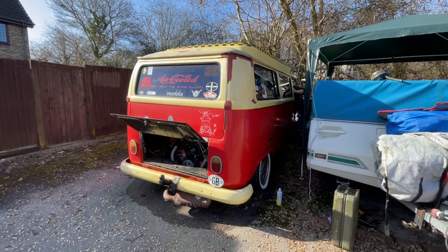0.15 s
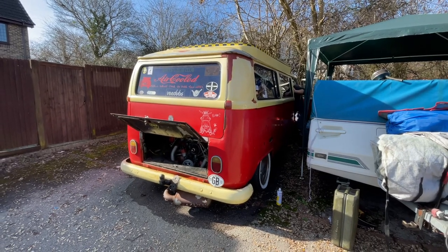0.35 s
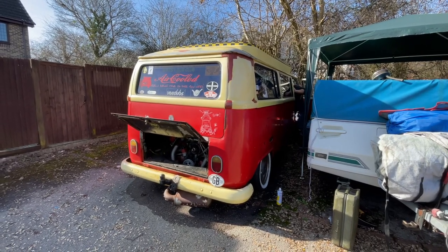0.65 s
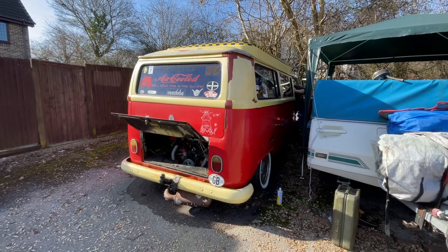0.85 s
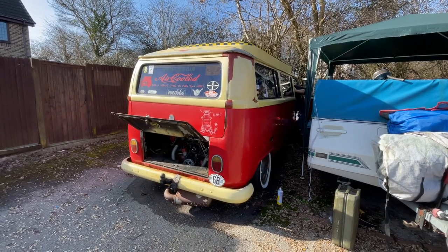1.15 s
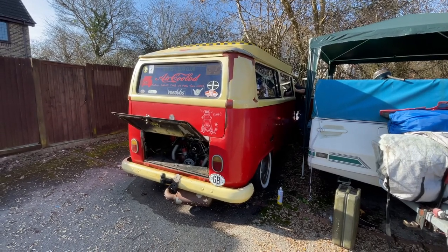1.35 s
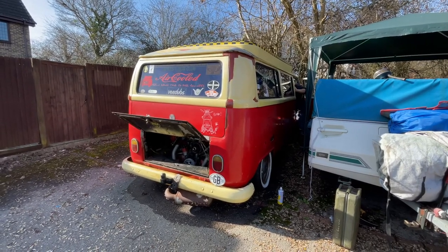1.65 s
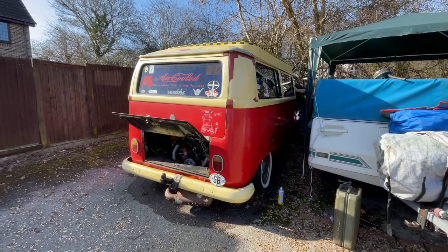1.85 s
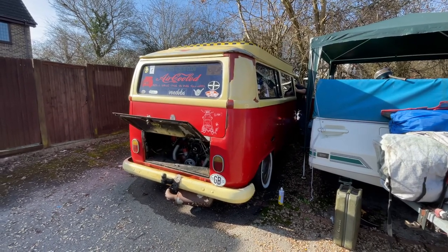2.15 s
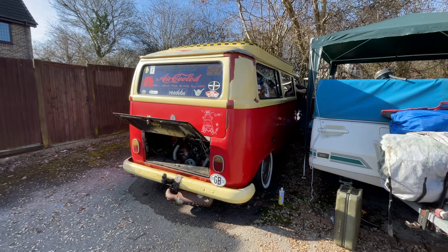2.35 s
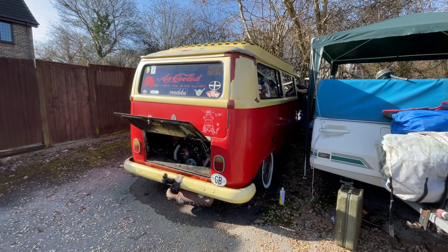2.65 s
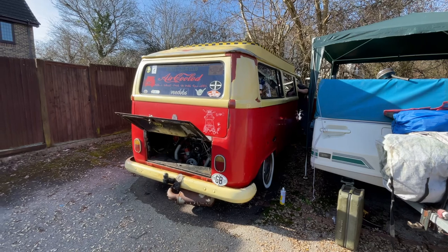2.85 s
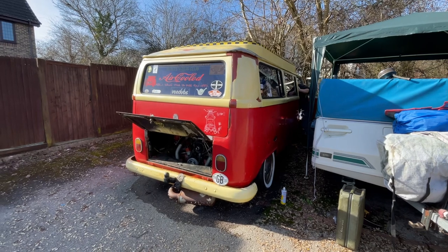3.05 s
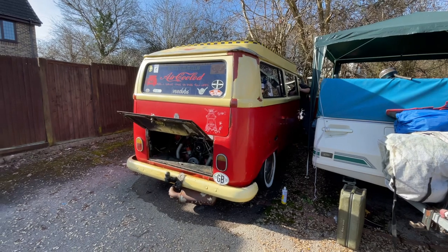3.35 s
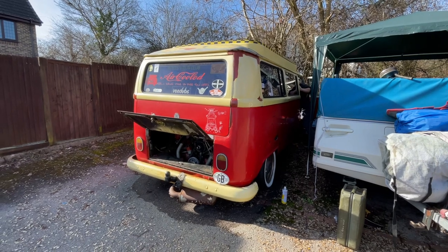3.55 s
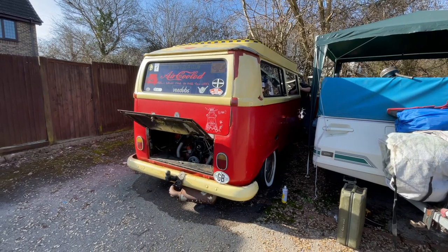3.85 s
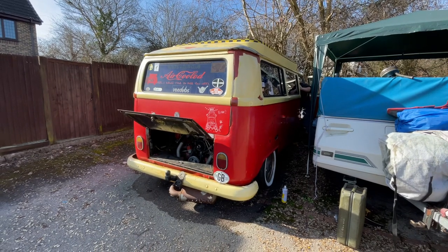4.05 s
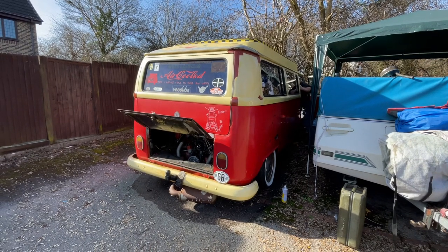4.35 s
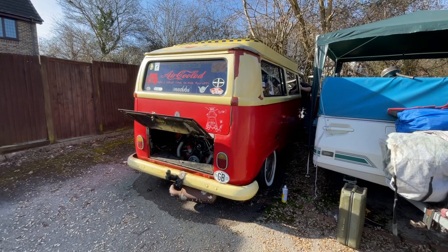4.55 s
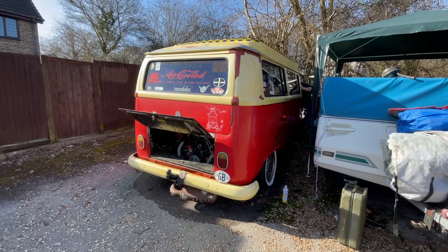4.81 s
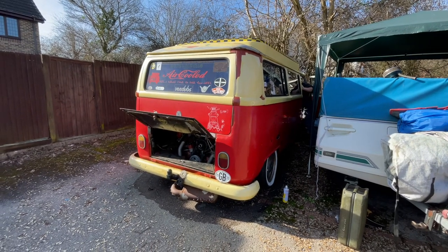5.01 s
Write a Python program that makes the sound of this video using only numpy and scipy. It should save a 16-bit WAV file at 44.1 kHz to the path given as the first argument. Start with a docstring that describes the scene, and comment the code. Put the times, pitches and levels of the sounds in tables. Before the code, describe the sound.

Outdoors on a gravel drive, near-silent breeze and very faint birds. Small keys click, ring and scrape in a lock for two seconds. Then a hard metallic clunk as the starter engages, and an air-cooled engine cranks with a pulsing growl, whine and rattle, about seven beats a second, never catching. Stereo microphone a few metres behind the open engine bay.

```python
"""A faint breeze and far birds come first, then keys click, ring and scrape in a lock.
A starter slams in and turns over an air-cooled flat four that never catches, a few metres away on a drive.
Each compression drags the gears down, then lets them run on. Tooth strikes and tiny impacts, shaped by
filters and resonances, make growl, whine and rasp; wavering tones make exhaust puffs and a low throb.
Reflections from the yard surround the engine, and filtered noise makes the air behind it."""
import sys
import numpy as np
from scipy import signal
from scipy.fft import rfft, irfft, next_fast_len
from scipy.io import wavfile
from scipy.ndimage import uniform_filter1d

SR = 44100
rng = np.random.default_rng(int(sys.argv[2]) if len(sys.argv) > 2 else 0)


def dump_mix(stems):
    """Bounce the given channels to the path in sys.argv[1] as a 16-bit WAV at rate SR."""
    frames = np.atleast_2d(stems).T  # one column per channel
    limited = np.clip(frames, -1, 1)  # hard clip at full scale
    pcm = np.round(limited * 32767).astype(np.int16)
    wavfile.write(sys.argv[1], SR, pcm)


N = 228349
T = np.arange(N) / SR  # time in seconds

# The compressions. Each row: time of top dead centre in seconds, relative level of its exhaust puff in dB.
COMPRESSIONS = [(2.682, -46), (2.838, -41), (2.984, -36), (3.126, -37), (3.264, -45), (3.402, -37.5),
                (3.543, -35), (3.679, -39), (3.817, -34.5), (3.953, -37), (4.095, -35.5), (4.233, -34),
                (4.372, -38), (4.512, -35), (4.653, -37), (4.793, -36.5), (4.935, -39), (5.072, -39.5)]
# Bright colour of touching keys. Each row: frequency in Hz, relative level in dB.
KEY_CLICK_COLOUR = [(1000, -31), (2700, 5), (5000, 6.5), (9000, 10.5), (13000, 1), (15500, -28)]
# Low colour of the heaving body. Each row: frequency in Hz, relative level in dB.
THROB_COLOUR = [(15, -44), (28, -26), (40, 6.5), (57, -7.5), (75, -8.5), (97, 3), (125, -4), (170, -3.5),
                (240, -4.5), (330, -14), (700, -44), (5000, -100)]

ENGAGE_S, LOADED_S = 2.465, 2.53  # the pinion meshes; the starter has taken up the load
FREE_HZ, DRAGGED_HZ = 531.7, 385.5  # middle tooth rates: at top dead centre, and at mid-stroke


def gain_of(db):
    """Turns decibels into an amplitude factor."""
    return 10 ** (np.asarray(db) / 20)


def evened(x):
    """Scales a signal to an rms of one."""
    return x / np.sqrt(np.mean(x ** 2) + 1e-20)


def read(points, hz):
    """Reads a table between its rows, on a log-frequency axis."""
    f, value = np.transpose(points)
    return np.interp(np.log(hz + 1), np.log(f + 1), value)


def noise():
    """White noise, equally strong at all frequencies."""
    return rng.standard_normal(N)


def drift(hz):
    """Slow random wandering of rms one, fading out above about the given rate."""
    smoothing = np.exp(-(np.fft.rfftfreq(N, 1 / SR) / hz) ** 2)
    return evened(irfft(rfft(noise()) * smoothing, N))


def grit(per_s, spread_db):
    """Tiny impacts of uneven size at random moments, with an rms of one."""
    hits = rng.random(N) < per_s / SR
    sizes = gain_of(spread_db * np.minimum(rng.exponential(1, N), 3))
    return evened(noise() * hits * sizes)


def colour(x, points, case_db=None, size=4096):
    """Filters at unit power without sounding early; case_db adds the ringing of the engine case."""
    # Engine case and tinware. Each row: frequency in Hz, width in Hz, a level in dB that goes unused.
    case_modes = [(1395, 48, 0), (2180, 210, -2), (2630, 22, -7), (3180, 13, -7), (3360, 9, -7),
                  (3480, 76, -9), (4640, 130, -14), (5800, 920, -15), (6230, 40, -15), (7500, 64, -19)]
    hz = abs(np.fft.fftfreq(size, 1 / SR))
    db = read(points, hz)
    if case_db is not None:
        peaks = [1 / (1 + (2 * (hz - f) / width) ** 2) for f, width, _ in case_modes]
        db = db + case_db * np.max(peaks, 0)
    # The Hilbert transform gives the phase with which the filter responds as early as it can.
    spectrum = np.exp(np.conj(signal.hilbert(np.log(gain_of(db)))))
    ringing = np.fft.ifft(spectrum).real
    return signal.oaconvolve(x, ringing / np.linalg.norm(ringing))[:N]


def resonate(x, hz, width):
    """A resonance of gain one whose pitch follows the curve hz."""
    turn = np.exp(2j * np.pi * np.cumsum(hz) / SR)
    r = np.exp(-np.pi * width / SR)
    # Shift the pitch down to zero, smooth, and shift it back up.
    smooth = signal.lfilter([1 - r], [1, -r], x / turn)
    return 2 * (turn * smooth).real


def taps(times, db):
    """One sharp impact, a single sample long, at each time."""
    out = np.zeros(N)
    out[np.round(np.asarray(times) * SR).astype(int)] = gain_of(db)
    return out


def blows(times, db, decay):
    """Loudness curve of sudden blows that die away."""
    rows = zip(*np.broadcast_arrays(times, db, decay))
    return sum(gain_of(d) * (T >= s) * np.exp(-abs(T - s) / k) for s, d, k in rows)


def swells(times, db, rise, fall):
    """Loudness curve of rounded swells; swells that overlap add in power."""
    power = 0
    for s, d in zip(*np.broadcast_arrays(times, db)):
        distance = (T - s) / np.where(T < s, rise, fall)
        power = power + gain_of(2 * d) * np.exp(-np.minimum(distance ** 2, 60))
    return np.sqrt(power)


def dead_centres():
    """The time in seconds of each top dead centre."""
    return np.transpose(COMPRESSIONS)[0]


def stroke_share():
    """Runs from zero to one between one top dead centre and the next."""
    s = dead_centres()
    turns = np.r_[ENGAGE_S, s, 2 * s[-1] - s[-2]]
    return np.interp(T, turns, np.arange(len(s) + 2)) % 1


def cranking():
    """Rises from zero to one as the starter takes up the load, then holds."""
    return np.clip((T - ENGAGE_S) / (LOADED_S - ENGAGE_S), 0, 1)


def easing():
    """Gain that sinks slowly once the starter has taken up the load."""
    ease_db_per_s = 0.54
    return gain_of(-ease_db_per_s * np.maximum(T - LOADED_S, 0))


def teeth(uneven_db=5.5):
    """One strike for each pinion tooth: slower under compression, faster once past it."""
    hz = DRAGGED_HZ + (FREE_HZ - DRAGGED_HZ) * np.cos(np.pi * stroke_share()) ** 2
    count = np.cumsum(hz * (1 + 0.025 * drift(60.27))) / SR
    # Each whole number passed is one tooth.
    strikes = np.diff(np.floor(count), prepend=0) * gain_of(uneven_db * drift(300))
    return evened(strikes - strikes.mean())


def panels(drive, width_hz=26):
    """Gears set body panels and shrouds ringing, each at its own pitch."""
    # The panels. Each row: frequency in Hz, relative level in dB.
    panel_modes = [(389, 6), (489, 5), (677, 1), (784, -8), (1000, 1.5), (1246, 2), (1400, 3.5), (1497, -7),
                   (2017, 0.5)]
    ringing = 0
    for hz, db in panel_modes:
        ringing = ringing + gain_of(db) * evened(resonate(drive, hz * np.ones(N), width_hz))
    return evened(ringing)


def gears(strikes, rough=0.77, steady_db=-50, take_up_db=-35, drone_db=-46.0, panels_db=-5):
    """Teeth growl through case and panels after each top dead centre, then drone under compression."""
    # Colour of the growl. Each row: frequency in Hz, relative level in dB.
    growl_colour = [(150, -55.5), (260, 4), (325, -13.5), (390, 7.5), (560, 2), (700, -2), (900, -2),
                    (1450, -6), (1650, -15.5), (2150, -14.5), (2700, -23), (4000, -20.5), (8000, -23.5),
                    (13000, -71)]
    growl_db, growl_delay_s = -38, 0.015  # drive level, and time after top dead centre
    s = dead_centres()
    drive = np.sqrt(1 - rough) * strikes + np.sqrt(rough) * grit(3500, 3.0)
    load_db = np.r_[take_up_db, np.full(len(s), growl_db)]
    load = swells(np.r_[LOADED_S, s + growl_delay_s], load_db, 0.025, 0.048)
    force = drive * np.hypot(load, gain_of(steady_db) * cranking())
    growl = colour(force, growl_colour, case_db=0.5)
    ringing = gain_of(panels_db) * np.std(growl) * panels(force)
    slowest_hz = np.full(N, DRAGGED_HZ)
    drone = evened(resonate(resonate(strikes, slowest_hz, 122), slowest_hz, 122))
    return growl + ringing + drone * swells(s + 0.078, drone_db, 0.05, 0.014)


def whine(strikes, rough=0.7, fade_db=-4, bite_db=-41, bite_s=0.013):
    """The starter sings up hoarsely as the load lets go, bites at top dead centre, then sags."""
    release_share = 0.677  # the load lets go at this share of a stroke
    whine_hz, sag_octaves, whine_db = 3395, 2.33, -54.5  # pitch at release, its sag, and the level there
    width_hz = 850
    since = (stroke_share() - release_share) % 1
    pitch = whine_hz * 2 ** (-sag_octaves * since) * (1 + 0.041 * drift(20))
    song = strikes + rough * noise()
    for _ in range(3):
        song = resonate(song, pitch, width_hz)
    steady = gain_of(whine_db + fade_db * since ** 2) * cranking()
    return evened(song) * np.hypot(steady, blows(dead_centres(), bite_db, bite_s))


def rasp(idle_db=-57.5, snap_db=-44):
    """Slack gears rattle dully, then chatter brightly around each top dead centre."""
    # Bright colour of the chatter. Each row: frequency in Hz, relative level in dB.
    bright_colour = [(900, -16), (2000, -1.5), (3100, 1.5), (4000, -4.5), (5800, -6.5), (7500, -13.5),
                     (10000, -7.5), (12300, -24), (13500, -31), (14300, -7)]
    chatter_db, rattle_db, rattle_lead_s = -42.5, -43.5, 0.032  # lead: time ahead of top dead centre
    s = dead_centres()
    chatter = np.hypot(swells(s, chatter_db, 0.022, 0.021), blows(s - 0.003, snap_db, 0.014)) * easing()
    level = np.hypot(chatter, gain_of(idle_db) * cranking())
    flicker = gain_of(3.9 * drift(73.0))
    bright = colour(level * grit(5000, 1.7) * flicker, bright_colour, case_db=3.5)
    rattle = swells(s - rattle_lead_s, rattle_db, 0.014, 0.018)
    dull = [(1000, -18.5), (2100, -5.0), (3100, 3.5), (4200, -8),
            (6000, -8), (7500, -7.5), (10000, -21), (13000, -43)]
    return bright + colour(rattle * grit(5000, 1.6), dull, case_db=6)


def clatter(strike_db=21.0, rattle_db=-10.0):
    """A loose tappet clacks; closing gear backlash strikes hard and rattles through the case."""
    # Gear backlash closing. Each row: time in seconds, relative level in dB.
    backlash = [(2.826, -31.5), (3.261, -31.5), (3.538, -35.5), (3.82, -28.5), (3.832, -27.5),
                (4.095, -29.5), (4.259, -42), (4.371, -31.5), (4.651, -30.5), (4.79, -33), (5.069, -31)]
    # Colour of those knocks. Each row: frequency in Hz, relative level in dB.
    knock_colour = [(120, -68), (270, 9), (450, 6), (650, 11.5), (950, -12), (2000, -2.5), (4000, -30),
                    (12000, -32), (16000, -72)]
    # Colour of the tappet. Each row: frequency in Hz, relative level in dB.
    clack_colour = [(300, -32), (1200, -7), (1800, 4), (2150, 8), (2600, -6), (3400, -6), (4200, -6),
                    (6000, -14.5), (10000, -21), (15000, -63)]
    tappet_db, tappet_lead_s = -34.5, 0.043  # lead: time ahead of its cylinder's top dead centre
    s, db = np.transpose(backlash)
    force = taps(s, db + strike_db) + blows(s, db + rattle_db, 0.028) * noise()
    knocks = colour(force, knock_colour, case_db=5)
    one_cylinder = dead_centres()[::4]  # every fourth compression
    clacks = blows(one_cylinder - tappet_lead_s, tappet_db, 0.0071) * grit(6000, 3.6)
    return colour(clacks, clack_colour, case_db=4) + knocks


def starter(heave_db=-11, bend=0.5, bend_s=0.0095):
    """Solenoid and pinion crash home; the engine lurches once, then rocks on its mounts."""
    # The starter slams in. Each row: start in seconds, relative level in dB, decay in seconds.
    slam = [(2.404, -54, 0.043), (2.429, -41, 0.014), (2.439, -30.5, 0.016), (2.448, -21, 0.0047),
            (2.463, -18.5, 0.0062), (2.47, -30.5, 0.0027)]
    # Colour of the slam. Each row: frequency in Hz, relative level in dB.
    clash_colour = [(88, -43), (150, -9.5), (649, -6.5), (1250, -3.5), (1700, -15), (2020, -4), (2600, -12),
                    (3340, -7), (4210, -18), (5300, -12), (8410, -16), (12600, -30), (15000, -49)]
    # Solenoid and pinion reach their stops. Each row: time in seconds, level in dB.
    stops = [(2.452, -27.5), (2.479, -21)]
    lurch_s, lurch_db = 2.504, -19.5
    rock_db, rock_decay_s, rock_hz = -26.5, 0.079, 172  # rock_hz: the pitch it settles around
    crash = colour(blows(*np.transpose(slam)) * grit(6000, 1.8), clash_colour, case_db=-1.5)

    clunk_colour = [(100, -32), (250, -12.5), (450, 2), (700, -5.5),
                    (1000, -8.0), (1600, -17.5), (4000, -49), (15000, -78)]
    clunk = colour(swells(*np.transpose(stops), 0.0072, 0.013) * noise(), clunk_colour)

    # The rocking tone falls in pitch after the last stop.
    fall = bend * np.exp(-np.maximum(T - stops[-1][0], 0) / bend_s)
    hz = rock_hz * (1 + fall + 0.043 * drift(36))
    rock = np.sqrt(2) * np.sin(2 * np.pi * np.cumsum(hz) / SR)
    shake_colour = [(40, -36), (65, -40), (120, 9.5), (250, 14.0),
                    (480, 4.0), (800, -10.0), (2000, -20), (15000, -116)]
    shake = colour(noise(), shake_colour)
    lurch = swells([lurch_s], lurch_db, 0.016, 0.015)
    jolt = np.hypot(lurch, blows([lurch_s], rock_db, rock_decay_s))
    heave = gain_of(heave_db) * lurch * colour(noise(), THROB_COLOUR)
    return crash + clunk + jolt * (rock + 0.3 * shake) + heave


def exhaust(puff_db=2.04):
    """Each opening exhaust valve blows a short, wavering note in the silencer."""
    puff_hz, puff_delay_s = 172.3, 0.037  # middle pitch; time from top dead centre to the open valve
    s, db = np.transpose(COMPRESSIONS)
    turns = np.cumsum(puff_hz * (1 + 0.0794 * drift(78.2))) / SR
    puffs = swells(s + puff_delay_s, db + puff_db, 0.02, 0.025)
    return np.sqrt(2) * puffs * np.sin(2 * np.pi * turns) * gain_of(1.7 * drift(52))


def throb(hz=57, rumble_db=-41, slack_db=-6):
    """The body booms as compression loads the mounts; its rumble eases at top dead centre."""
    throb_db, throb_delay_s = -38, 0.077
    strain_db = 5.5  # extra level of the first two booms
    s = np.r_[LOADED_S, dead_centres() + throb_delay_s]
    boom = swells(s, throb_db + strain_db * (np.arange(len(s)) < 2), 0.039, 0.038)
    turns = np.cumsum(hz * (1 + 0.096 * drift(24.5))) / SR
    tone = np.sqrt(2) * np.sin(2 * np.pi * turns)
    eased = gain_of(rumble_db + slack_db * np.cos(np.pi * stroke_share()) ** 2)
    return boom * tone * easing() + eased * colour(noise() * cranking(), THROB_COLOUR)


def keys(strike_db=15.0, touch_spread_db=2.0):
    """Swinging keys click together and ring at several fading pitches."""
    # Key touches. Each row: start in seconds, relative click level in dB, relative ring level in dB.
    touches = [(0.558, -49, -80), (0.777, -51, -60), (0.931, -55, -75), (0.957, -47, -46.5),
               (1.023, -52.5, -56), (1.201, -56, -55.5), (1.297, -73, -58), (1.421, -56, -62.5),
               (1.699, -49.5, -47), (1.886, -61, -84), (1.97, -55, -66), (2.208, -63, -67.5),
               (2.323, -59.5, -78)]
    # How keys ring. Each row: frequency in Hz, relative level in dB, time to fall by 60 dB in seconds.
    key_modes = [(2704, 1, 0.19), (4600, -10, 0.18), (5560, -8.5, 0.12), (8100, -8.5, 0.21),
                 (9600, -13, 0.15), (12160, -25, 0.07), (12860, -36, .1), (13260, -17, 0.091)]
    s, click_db, ring_db = np.transpose(touches)
    scrape = blows(s, click_db + 0.5, 0.0029) * grit(2500, 10.7)
    out = colour(taps(s, click_db + strike_db) + scrape, KEY_CLICK_COLOUR)
    hz, db, t60 = np.transpose(key_modes)[:, :, None]
    t = T[:SR // 3]
    for start, level_db in zip(s, ring_db):
        touch, phase, detune = rng.standard_normal((3, len(hz), 1))
        fade = gain_of(level_db + db + touch_spread_db * touch - 60 * t / t60)
        ring = fade * np.sin(2 * np.pi * (hz * (1 + 0.0018 * detune) * t + phase))
        out[round(start * SR):][:len(t)] += ring.sum(0)
    return out


def lock(barrel_db=2.5, pins_db=0.0):
    """The key knocks home and ticks over the pins in loose clusters; the barrel answers dully."""
    # The key scrapes over pins. Each row: time in seconds, relative level in dB.
    pin_scrapes = [(0.689, -49), (0.707, -53.5), (0.727, -60), (1.128, -54), (1.15, -51.5), (1.18, -47.5),
                   (1.194, -53), (1.305, -64)]
    # Dull colour of the barrel. Each row: frequency in Hz, relative level in dB.
    barrel_colour = [(200, -18), (420, -1.5), (600, 3), (1000, -7), (1500, -6), (2200, -9), (2800, -10),
                     (5000, -37), (15000, -72)]
    seat_s, seat_db, seat_hz, seat_decay_s = 0.686, -40, 427, 0.012  # the key bottoms in the lock
    scrape = swells(*np.transpose(pin_scrapes), 0.0036, 0.0031) * grit(1300, 4.5)
    seat = blows([seat_s], seat_db, seat_decay_s) * np.sin(2 * np.pi * seat_hz * (T - seat_s))
    barrel = gain_of(barrel_db) * colour(scrape, barrel_colour)
    pins = gain_of(pins_db) * colour(scrape, KEY_CLICK_COLOUR)
    return seat + barrel + pins


def buffet(hz=76, width=0.01, crossing_s=0.0042, right_db=-6.0):
    """Puffs of wind thump the left side of the microphone, and the right side a moment later."""
    # Wind thumps. Each row: time in seconds, level in dB on the left.
    thumps = [(4.322, -18.5), (4.369, -29), (4.44, -28)]
    s, db = np.transpose(thumps)
    push = -np.sqrt(2) * swells(s, db, width, width) * np.cos(2 * np.pi * hz * (T - s[0]))
    return np.array([push, gain_of(right_db) * np.interp(T - crossing_s, T, push)])


def birds():
    """Far birds give thin whistles that slide and waver in pitch."""
    # Each row: start in seconds, length in seconds, start and end pitch in Hz, relative level in dB.
    whistles = [(0.267, 0.24, 3300, 2870, -80.5), (0.36, 0.14, 5550, 3230, -81),
                (0.785, 0.13, 3270, 2940, -78), (1.958, 0.16, 4260, 4100, -81),
                (2.17, 0.23, 4150, 4200, -82.5)]
    out = np.zeros(N)
    for s, length, start_hz, end_hz, db in whistles:
        count = round(length * SR)
        waver = 1 + 0.41 * uniform_filter1d(rng.standard_normal(count), size=100)
        hz = np.linspace(start_hz, end_hz, count) * waver
        whistle = 2 * np.hanning(count) * np.sin(2 * np.pi * np.cumsum(hz) / SR)
        out[round(s * SR):][:count] += gain_of(db) * whistle
    return out


def outdoors(gust_db=0.0, waver_db=0.3):
    """Coloured noise makes a low breeze, a far wash, a blurred bird chorus and one swell of thin hiss."""
    # Level of the breeze. Each row: time in seconds, level in dB.
    breeze_level = [(0, -55), (.5, -55), (1.15, -50.5), (1.45, -56.5), (1.7, -52.5)]
    # Colour of the breeze. Each row: frequency in Hz, relative level in dB.
    breeze_colour = [(20, -51), (40, 5.5), (60, 4.5), (85, 6), (120, -5), (175, -2), (260, -12.5),
                     (500, -40), (5000, -100)]
    # A distant chorus swells in the trees. Each row: time of its height in seconds, level in dB.
    chorus_swells = [(.45, -79.5), (.85, -71.5), (1.78, -71.5)]
    # Colour of the far wash. Each row: frequency in Hz, relative level in dB.
    wash_colour = [(120, -29), (220, -7), (450, -7.5), (650, -7.5), (1030, -8), (1500, -17.5), (2200, -26),
                   (3500, -43.5), (6000, -41.5), (10000, -44.5), (12500, -57), (16000, -69)]
    breeze_db = np.interp(T, *np.transpose(breeze_level)) + gust_db * drift(2.7)
    breeze = gain_of(breeze_db) * colour(noise(), breeze_colour)

    hiss_s, hiss_db, hiss_width_s = 1.78, -75.5, 0.28
    hiss_colour = [(2000, -29), (5500, -31), (7500, -11), (9500, -6), (11500, -28), (14000, -65)]
    hiss = swells([hiss_s], hiss_db, hiss_width_s, hiss_width_s) * colour(noise(), hiss_colour)

    rise_s, fall_s = 0.13, 0.3
    chorus_colour = [(1200, -24), (2300, -3), (3100, 1), (4300, -4.5), (5500, -21), (9000, -26)]
    chorus = swells(*np.transpose(chorus_swells), rise_s, fall_s) * colour(noise(), chorus_colour)

    wash_db = -59  # middle level
    sides = np.array([colour(noise(), wash_colour) for _ in "LR"])
    wash = gain_of(wash_db + waver_db * drift(4.4)) * sides
    return yard(breeze + hiss + chorus, 0, wet_db=9) + wash


def yard(x, lag_samples, wet_db=0., size=16384):
    """Direct sound lags on the right (leads if negative); bay, fence and ground scatter a diffuse tail."""
    # Reflections against direct sound. Each row: frequency in Hz, relative level in dB.
    scatter = [(50, -14), (170, -16.5), (400, -1.5), (1000, -2), (3000, 3.5), (8000, 3.5)]
    # Fading of reflections. Each row: frequency in Hz, time to fall by 60 dB in seconds.
    tail_t60 = [(60, 0.39), (200, 0.066), (1000, 0.19), (4000, 0.16), (12000, 0.17)]
    count = next_fast_len(N + size)
    hz = np.fft.rfftfreq(count, 1 / SR)
    # Three pairs of noise tails, with each frequency band fading at its own pace.
    bands, t, z = signal.stft(rng.standard_normal((3, 2, size)), SR, nperseg=256)
    z = z * gain_of(-60 * t / read(tail_t60, bands)[:, None])
    tails = signal.istft(z, SR, nperseg=256)[1]
    tails /= np.linalg.norm(tails, axis=2, keepdims=True)
    # The sound moves round the three pairs nine times a second.
    feeds = np.sqrt(2 / 3) * np.cos(2 * np.pi * (9 * T + np.arange(3)[:, None] / 3))
    scattered = (rfft(x * feeds, count)[:, None] * rfft(tails, count)).sum(0)
    lags = np.array([[0], [lag_samples]])  # left, right
    direct = rfft(x, count) * np.exp(-2j * np.pi * hz * lags / SR)
    wet = gain_of(read(scatter, hz) + wet_db)
    return irfft((direct + wet * scattered) / np.sqrt(1 + wet ** 2), count)[:, :N]


def scene():
    """The engine bay in front, keys in the cab, birds far off."""
    top_hz = 13400  # the engine's sounds fall away steeply above this
    strikes = teeth()
    running = gears(strikes) + whine(strikes) + rasp() + clatter()
    running = signal.sosfilt(signal.butter(16, top_hz, fs=SR, output="sos"), running)
    metal = yard(running + starter(), 3.66, wet_db=-2.0)
    bass = yard(exhaust() + throb(), -16, wet_db=4.0)
    cab = yard(keys() + lock(), 3.74, wet_db=1.5)
    trees = yard(birds(), 0, wet_db=10)
    return metal + bass + cab + trees + outdoors() + buffet()


def record(dry):
    """Left and right colour the sound a little differently; a steep filter then removes the very top."""
    # Left against right. Each row: frequency in Hz, difference in dB.
    side_lean = [(60, -2.5), (99, -2), (160, -0.5), (270, -1.5), (450, 0.5), (740, 1.5), (1220, 0.5),
                 (2010, 0.5), (3330, 0.5), (5500, 6.5), (9080, -3.5), (15000, 0.0)]
    edge_hz = 15650
    lean_db = read(side_lean, np.fft.rfftfreq(N, 1 / SR)) / 2  # half the difference to each side
    heard = irfft(rfft(dry) * gain_of([lean_db, -lean_db]), N)
    low_pass = signal.firwin(511, edge_hz, window=("kaiser", 9), fs=SR)
    return signal.oaconvolve(heard, low_pass[None], "same")


dry = scene()
out = record(dry)
dump_mix(out)
```